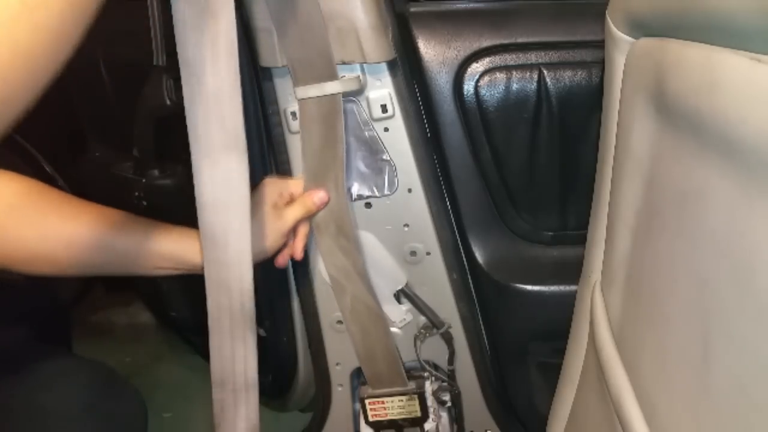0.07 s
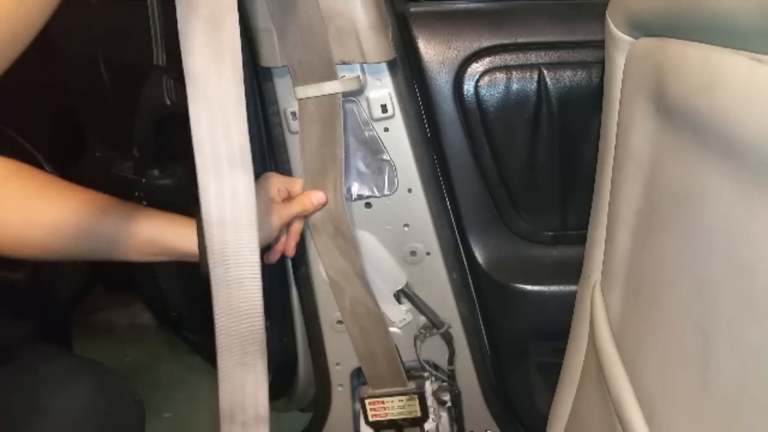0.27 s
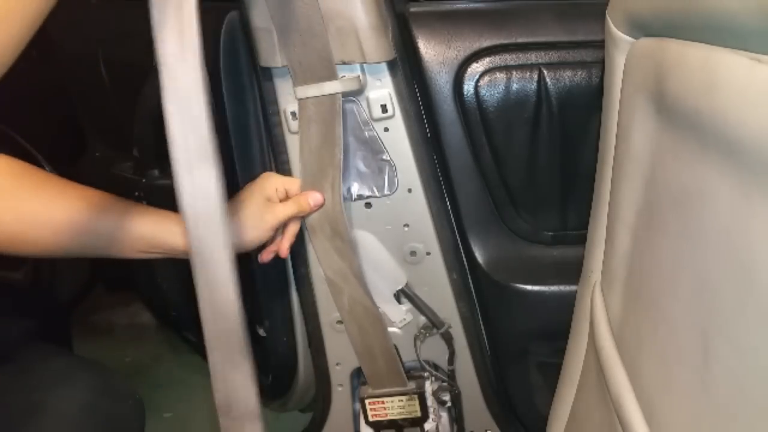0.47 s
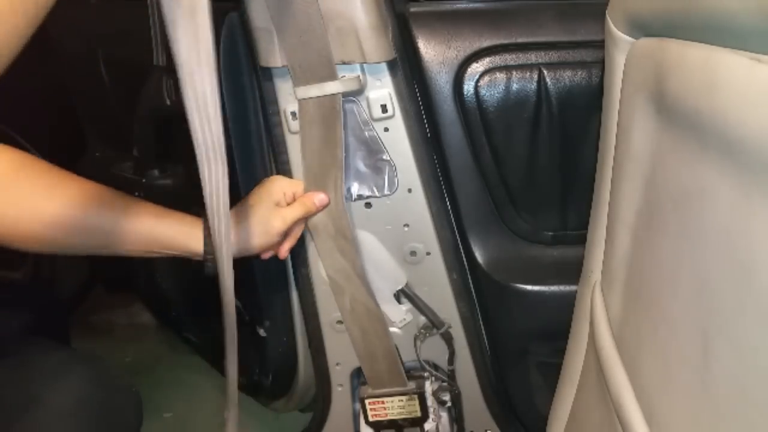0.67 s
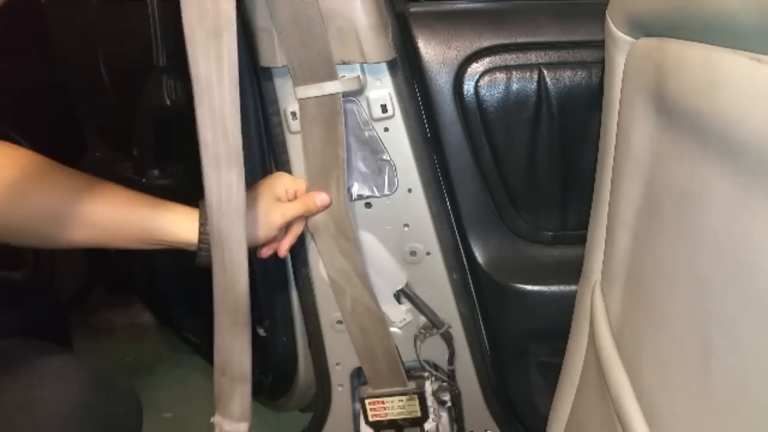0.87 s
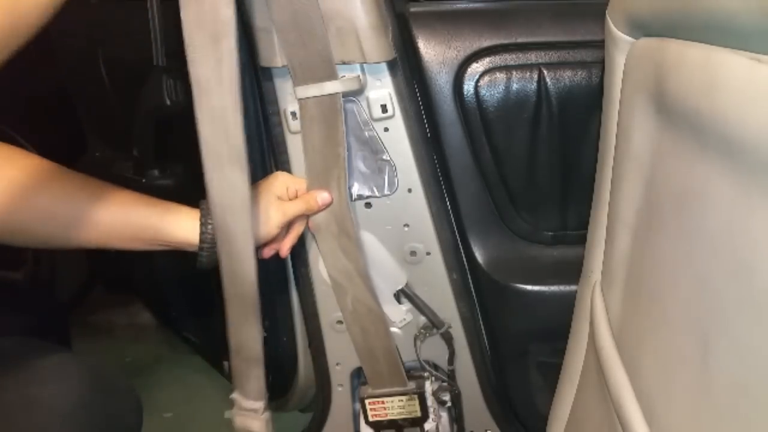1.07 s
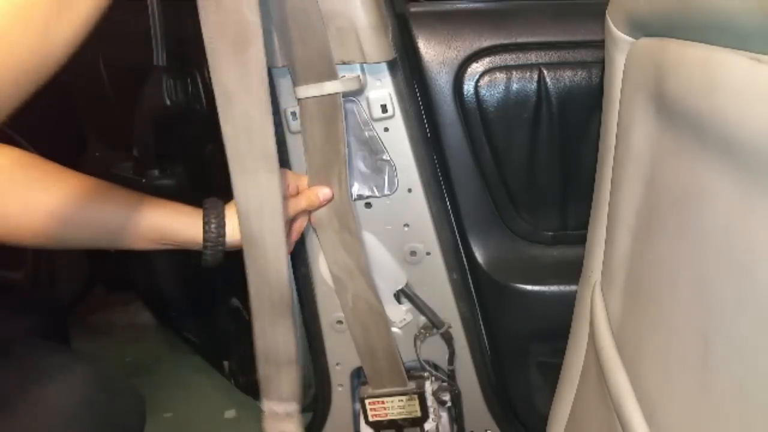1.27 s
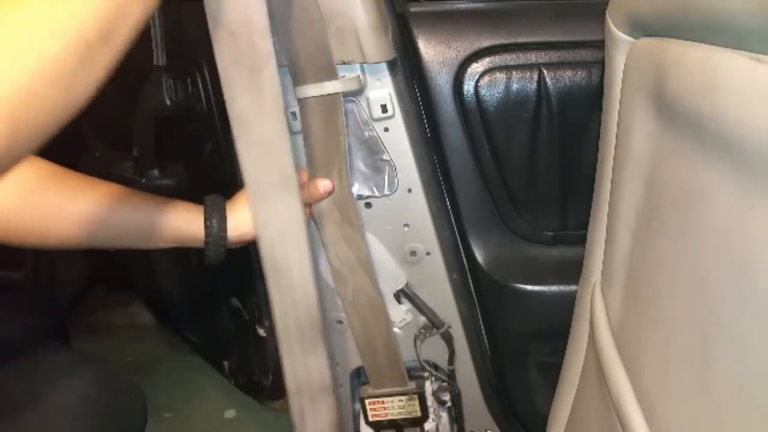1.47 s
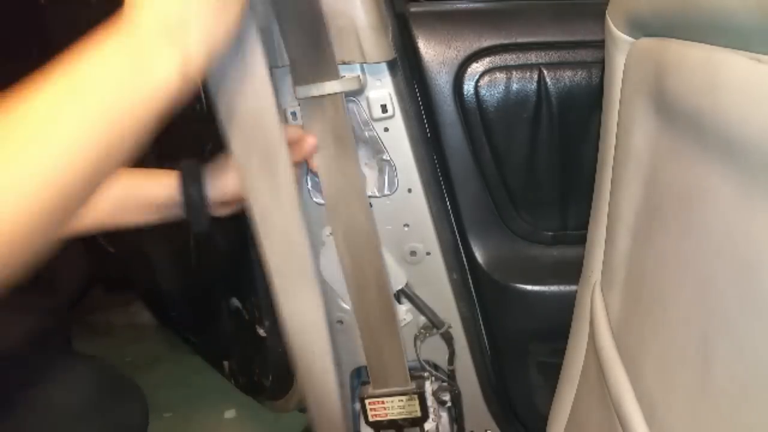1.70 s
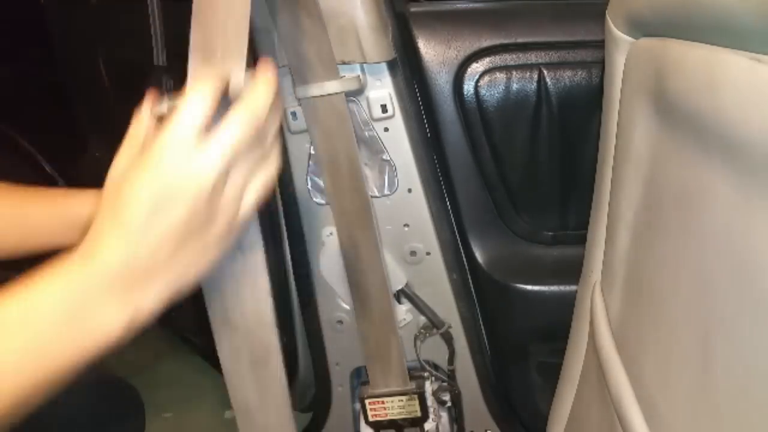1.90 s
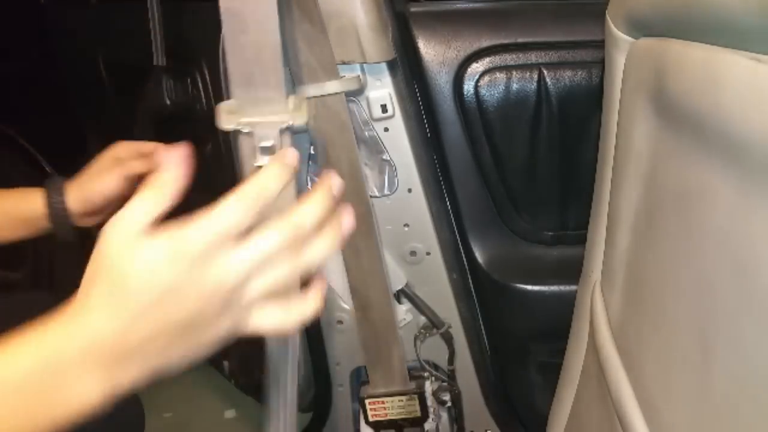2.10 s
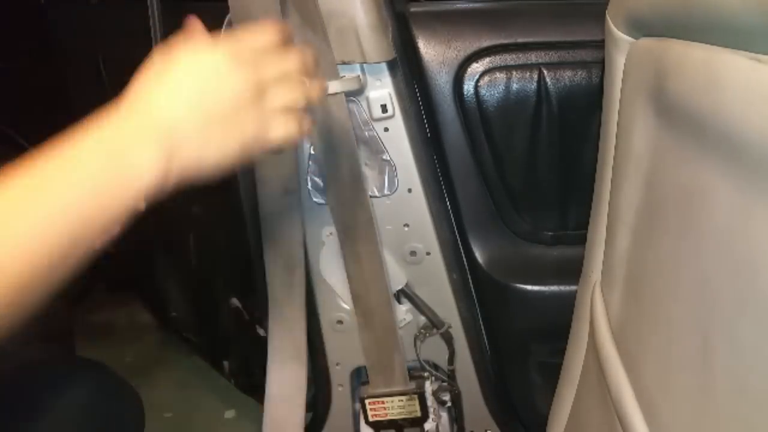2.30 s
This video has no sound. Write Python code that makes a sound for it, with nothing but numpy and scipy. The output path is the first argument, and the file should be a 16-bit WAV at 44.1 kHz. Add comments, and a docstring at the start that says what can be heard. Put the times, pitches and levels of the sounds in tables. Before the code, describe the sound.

Seat belt retractor clacks and thuds, followed by light handling and webbing zipping back in.

```python
"""A seat belt retractor in a parked car: its steel pawl catches, then locks with a clack and a
sinking boom in the bare pillar. Plastic ticks, soft bumps, scuffs and faint squeaks follow as the
belt is handled. Then the webbing whirrs back onto its spool, its ribs passing the guide at a pitch
that rises and falls with its speed. The small, padded cabin answers briefly over a faint rumble and hiss."""
import sys
import numpy as np
from scipy import signal
from scipy.fft import rfft, irfft, next_fast_len
from scipy.io import wavfile
from scipy.ndimage import map_coordinates

SR = 44100
rng = np.random.default_rng(int(sys.argv[2]) if len(sys.argv) > 2 else 0)


def pcm_store(signal):
    """Save signal as 16-bit PCM."""
    levels = np.round(np.clip(np.atleast_2d(signal), -1, 1) * 32767)
    wavfile.write(sys.argv[1], SR, levels.astype(np.int16).T)


N = 108045

# how alike left and right are in the cabin: frequency_hz, correlation
STEREO_LIKENESS = [(250, 0.87), (600, 0.45), (1200, 0.081), (2500, -0.017)]


def amp(db):
    """Decibels to gain."""
    return 10 ** (np.asarray(db) / 20)


def unit(x):
    """Scale to rms 1."""
    return x / np.sqrt(np.mean(x ** 2) + 1e-20)


def along(points, hz):
    """Read a curve of (frequency_hz, value) points on a log frequency axis."""
    knots_hz, values = np.transpose(points)
    return np.interp(np.log(hz + 1), np.log(knots_hz + 1), values)


def since(start_s):
    """Seconds since start_s, zero before."""
    return np.maximum(np.arange(N) / SR - start_s, 0)


def wobble(rate_hz):
    """A smooth random curve with rate_hz knots a second."""
    return map_coordinates(rng.standard_normal(4096), [since(0) * rate_hz], mode="wrap")


def filtered(x, response):
    """Shape x with a frequency response."""
    size = next_fast_len(N + 8192, True)
    return irfft(rfft(x, size) * response(np.fft.rfftfreq(size, 1 / SR)), size)[..., :N]


def spread(hz):
    """Stereo width as an angle in radians: narrow bass, wide treble."""
    return np.arccos(np.clip(along(STEREO_LIKENESS, hz), -1, 1)) / 2


def noise(spectrum):
    """Coloured stereo noise of rms 1, alike on both sides only in the bass."""
    def response(hz):
        angle = spread(hz)
        return amp(along(spectrum, hz)) * [np.cos(angle), np.sin(angle)]
    mid, side = filtered(rng.standard_normal((2, N)), response)
    return unit(np.array([mid + side, mid - side]))


def strike(start_s, rise_s, hold_s, t60_s):
    """Percussive envelope: attack, hold, release."""
    return (1 - np.exp(-since(start_s) / rise_s)) * amp(-60 * since(start_s + hold_s) / t60_s)


def swell(middle_s, half_s):
    """Bell-shaped envelope."""
    return np.exp(-((since(0) - middle_s) / half_s) ** 2 / 2)


def ring(modes, start_s, rise_s):
    """Struck, damped modes; high ones reach the two sides out of step."""
    out, start = np.zeros((2, N)), int(start_s * SR)
    t = np.arange(min(SR, N - start)) / SR
    for hz, db, t60_s in modes:
        apart = spread(hz) * rng.choice([-1, 1])
        phase = rng.uniform(0, 2 * np.pi) + np.array([[apart], [-apart]])
        envelope = amp(db - 60 * t / t60_s) * (1 - np.exp(-t / rise_s))
        out[:, start:start + len(t)] += envelope * np.sin(2 * np.pi * hz * t + phase)
    return out


def rough_tone(hz, wander=.034, roughness=.75):
    """A wavering stereo tone on a pitch curve, its strength fluttering."""
    def flutter():
        return roughness * (wobble(110) + 1j * wobble(110))
    phase = 2 * np.pi * np.cumsum(hz * (1 + wander * wobble(70))) / SR
    shared = 1 + flutter()
    sides = np.array([shared + .5 * flutter(), shared + .5 * flutter()])
    return unit(np.real(sides * np.exp(1j * phase)))


def pan(left_db):
    """Stereo gains that put the left side left_db above the right."""
    return amp(np.array([[left_db], [-left_db]]) / 2)


def cabin_tone():
    """A faint, steady bed of rumble and hiss."""
    # the cabin's background: frequency_hz, level_db
    spectrum = [(18, -16), (43, 1), (80, -8.5), (150, -8), (550, -23), (1600, -29), (4200, -34),
                (5300, -29.5), (7700, -40.5), (15500, -37.5)]
    return amp(-60.5) * noise(spectrum)


def pawl():
    """Each blow chatters and rings the steel frame; a light one is duller, a long one shimmers more."""
    # catch, then lock: start_s, level_db, contact_s, chatter_t60_s, cutoff_hz
    blows = [(0.1713, -39, 0.0035, .04, 7100), (.2034, -21.5, 0.007, .075, 13200)]
    # colour of the chatter: frequency_hz, level_db
    chatter_spectrum = [(80, -39), (220, -15), (450, -5), (900, -17.5), (1170, -2.5), (1500, -11.5),
                        (2200, -5.5), (3100, -3.5), (4600, -10.5), (8300, -27.5), (10500, -23),
                        (15500, -36.5)]
    # colour of the shimmering tail: frequency_hz, level_db
    shimmer_spectrum = [(380, 4.5), (850, -6.5), (1200, -0.5), (1600, -13.5), (2600, -7.5), (3080, -1),
                        (3600, -8.5), (8000, -28.5), (15000, -37.5)]
    # modes of the retractor's frame: pitch_hz, level_db, t60_s
    steel_modes = [(1790, -10.5, .12), (2440, -8.5, 0.087), (2619, -6.5, .1), (2880, -11, 0.098),
                   (3005, -22.5, 0.35), (3090, 1.5, .075), (3390, -14, 0.073)]
    out, longest_s = np.zeros((2, N)), max(row[2] for row in blows)
    for start_s, db, contact_s, t60_s, cutoff_hz in blows:
        chatter = filtered(noise(chatter_spectrum), lambda hz: 1 / np.sqrt(1 + (hz / cutoff_hz) ** 4))
        chatter *= strike(start_s, .0008, contact_s, t60_s)
        shimmer = noise(shimmer_spectrum) * strike(start_s, rise_s=contact_s, hold_s=0, t60_s=.7)
        steel = ring(steel_modes, start_s, rise_s=.002)
        out += amp(db) * (chatter + amp(-17.5) * contact_s / longest_s * shimmer + amp(1.5) * steel)
    return out


def pillar(lock_s=.207, shove_s=.2183, shove_half_s=.00085):
    """The lock jolts the sheet-metal pillar into a boom; low modes build slower and ring longer."""
    # modes of the pillar: pitch_hz, level_db
    modes = [(102, -13), (130, -9), (159, -6), (190, -6), (222, -4), (250, -9), (320, -6), (368, -3.5),
             (441, -1), (502, -3.5), (587, -7), (1160, 3)]
    lowest_hz, lowest_t60_s, damping_power, rise_cycles = modes[0][0], .65, .86, 3
    thud = np.zeros((2, N))
    for hz, db in modes:
        t60_s = lowest_t60_s * (lowest_hz / hz) ** damping_power
        thud += ring([(hz, db, t60_s)], lock_s, rise_cycles / hz)
    # the spool stops dead and shoves the pillar once
    shove = (((since(0) - shove_s) / shove_half_s) ** 2 - 1) * swell(shove_s, shove_half_s)
    # noisy body of the boom: frequency_hz, level_db
    boom_spectrum = [(60, -36), (130, 6.5), (220, -2), (500, -3), (1200, -7.5), (2500, -32)]
    boom = noise(boom_spectrum) * strike(lock_s, rise_s=.0032, hold_s=.012, t60_s=.2)
    return amp(-26.5) * thud + amp(-18) * shove + amp(-29.5) * boom


def sinking_boom(start_s=.22, from_hz=280, to_hz=79.3, fall_s=.055):
    """The boom's strongest tone slides down into the bass as it dies."""
    hz = to_hz + (from_hz - to_hz) * np.exp(-since(start_s) / fall_s)
    tone = np.sin(2 * np.pi * (np.cumsum(hz) / SR + rng.uniform()))
    return amp(-27.5) * strike(start_s, rise_s=.008, hold_s=0, t60_s=.42) * tone


def plastic_ticks(t60_cycles=11):
    """Two sharp plastic ticks to the right, each with a faint cabin echo."""
    # tick cues: start_s, level_db, left_over_right_db
    cues = [(0.476, -26.5, -10), (1.1510, -43.5, -6.5)]
    # modes of the plastic: pitch_hz, level_db
    plastic_modes = [(1650, -9), (2350, -6), (3000, -6), (3800, -3.5), (6000, -3.5), (11200, -4),
                     (13500, -3)]
    modes = [(hz, db, t60_cycles / hz) for hz, db in plastic_modes]
    out = np.zeros((2, N))
    for start_s, db, left_db in cues:
        tick = amp(db) * ring(modes, start_s, rise_s=.00016)
        cabin = rng.standard_normal((2, N)) * strike(0, rise_s=.00094, hold_s=0, t60_s=.049)
        echo = signal.fftconvolve(tick, cabin / np.linalg.norm(cabin[0]), axes=1)[:, :N]
        out += tick * pan(left_db) + amp(-7.5) * echo
    return out


def bumps(rise_s=.0035, hold_s=.004, t60_s=.11):
    """Hand and belt tap the trim: each a short, dull ring with a puff of noise around it."""
    # taps on the trim: start_s, level_db, pitch_hz
    taps = [(0.659, -57, 563), (.678, -54, 370), (0.743, -51.5, 363), (.870, -53, 432), (1.003, -48, 728),
            (1.206, -50.5, 264), (1.441, -55, 437), (1.516, -56.5, 353), (1.579, -55.5, 541),
            (1.662, -59, 590), (2.02, -47, 687), (2.166, -54, 235)]
    out = np.zeros((2, N))
    for start_s, db, hz in taps:
        puff_spectrum = [(hz / 10, -16), (hz, 0), (2 * hz, -9), (10 * hz, -38), (SR / 2, -60)]
        puff = noise(puff_spectrum) * strike(start_s, rise_s, hold_s, t60_s)
        out += amp(db) * (ring([(hz, -.5, t60_s)], start_s, rise_s) + puff)
    return out


def rubs():
    """The webbing scuffs and fingers squeak faintly on it, in brief swells of noise."""
    # scuff cues: middle_s, level_db, half_length_s
    scuffs = [(0.667, -65, 0.0052), (1.387, -67.5, 0.022), (1.597, -64.5, 0.018), (2.099, -57, 0.0092),
              (2.159, -58.5, 0.011)]
    # broad colour of a scuff: frequency_hz, level_db
    scuff_spectrum = [(300, 2.5), (2400, 0.5), (6200, -6), (8500, -15), (15000, -16)]
    # squeak cues: middle_s, level_db, half_length_s
    squeaks = [(0.873, -59.5, 0.0062), (0.976, -62.5, 0.014)]
    # peaky colour of a squeak: frequency_hz, level_db
    squeak_spectrum = [(1500, -6.5), (3000, -5), (3620, 6), (4000, -10), (12000, -23)]
    out = np.zeros((2, N))
    for cues, spectrum in (scuffs, scuff_spectrum), (squeaks, squeak_spectrum):
        out += noise(spectrum) * sum(amp(db) * swell(middle_s, half_s) for middle_s, db, half_s in cues)
    return out


def webbing(zip_s=1.735, zip_hz=535, zip_hz_per_s=-1100):
    """The belt runs in: grainy sliding hiss, and a whirr from its ribs that follows the speed."""
    # belt speed as ribs passing the guide: time_s, rate_hz
    rib_rate = [(1.73, 70.24), (1.765, 227.4), (1.805, 253.4), (1.83, 437.3), (1.87, 569.5), (1.92, 602),
                (1.955, 568), (2.0, 488.3), (2.035, 248.7), (2.08, 217), (2.14, 68.4)]
    # fader curve for hiss and whirr: time_s, level_db
    run_level = [(1.63, -74.5), (1.72, -61.5), (1.765, -57.5), (1.785, -53.5), (1.90, -48.5), (2.03, -56),
                 (2.07, -61), (2.22, -80)]
    # colour of the sliding hiss: frequency_hz, level_db
    slide_spectrum = [(80, -12.5), (200, -7), (380, -13), (660, -7.5), (830, -2.5), (920, -14.5),
                      (1130, -7), (1330, -15), (2600, -15.5), (4200, -22), (6200, -21), (8200, -30),
                      (15500, -34)]
    # partials of the whirr: ratio_to_rib_rate, level_db
    partials = [(1.002, -3), (1.141, -2.5), (1.87, -6)]
    # body resonance they sweep through: frequency_hz, level_db
    body = [(120, -4.5), (228, 8.5), (310, -4), (560, 1.5)]
    t = since(0)
    level = amp(np.interp(t, *np.transpose(run_level), left=-120, right=-120))
    rib_hz = np.interp(t, *np.transpose(rib_rate))
    grain = amp(1.5 * wobble(300))
    hiss = amp(3.5) * unit(noise(slide_spectrum) * grain)
    whirr = sum(amp(db + along(body, ratio * rib_hz)) * rough_tone(ratio * rib_hz)
                for ratio, db in partials)
    # a short falling zip as the belt starts
    falling_zip = swell(zip_s, half_s=.024) * rough_tone(zip_hz + zip_hz_per_s * (t - zip_s))
    return level * (hiss + whirr) + amp(-52.5) * falling_zip


def reflections(x, count=8, gain=.15, above_hz=2000):
    """Glass and trim close by throw back weak copies of the treble."""
    delays_s = rng.uniform(.002, .012, (count, 1))
    def response(hz):
        treble = hz ** 2 / (hz ** 2 + above_hz ** 2)
        return 1 + gain * treble * np.exp(-2j * np.pi * delays_s * hz).sum(0)
    return filtered(x, response)


def scene():
    """Belt, pillar and cabin tone sit a little to the left, the ticks to the right."""
    belt = reflections(pawl() + bumps() + rubs() + webbing())
    return pan(left_db=1) * (cabin_tone() + belt + pillar() + sinking_boom()) + plastic_ticks()


def record(dry):
    """A steep high cut at 16 kHz."""
    return filtered(dry, lambda hz: 1 / np.sqrt(1 + (hz / 16000) ** 160))


dry = scene()
out = record(dry)
pcm_store(out)
```